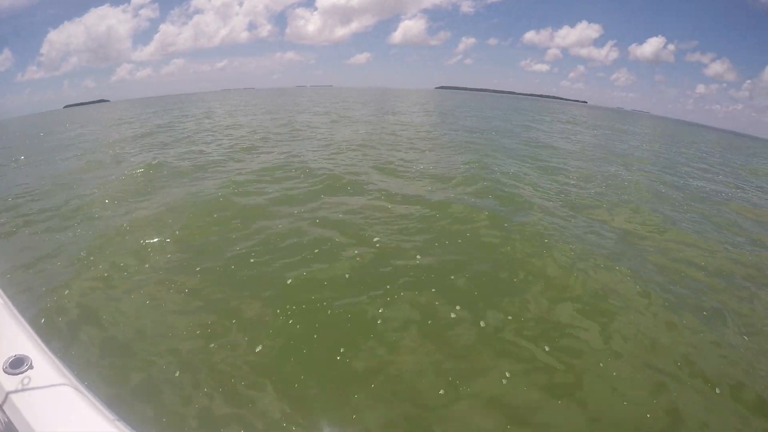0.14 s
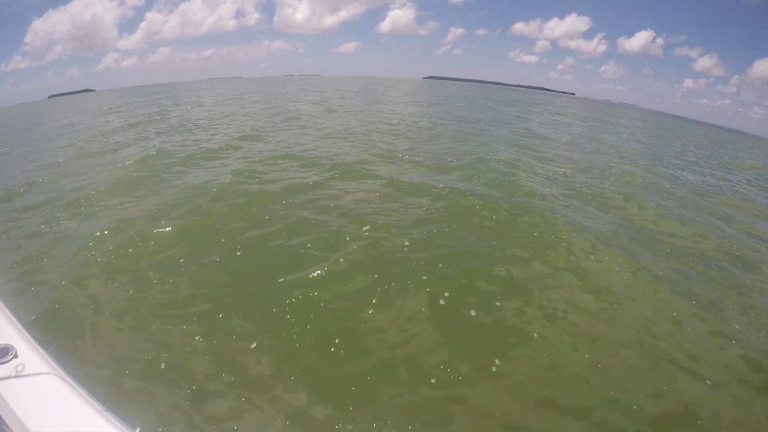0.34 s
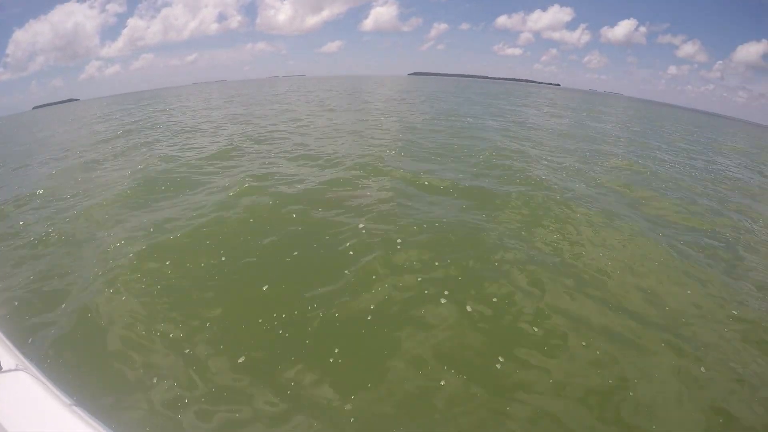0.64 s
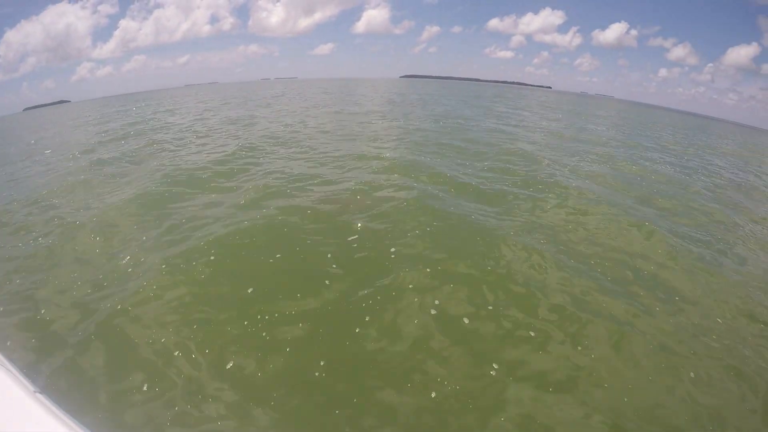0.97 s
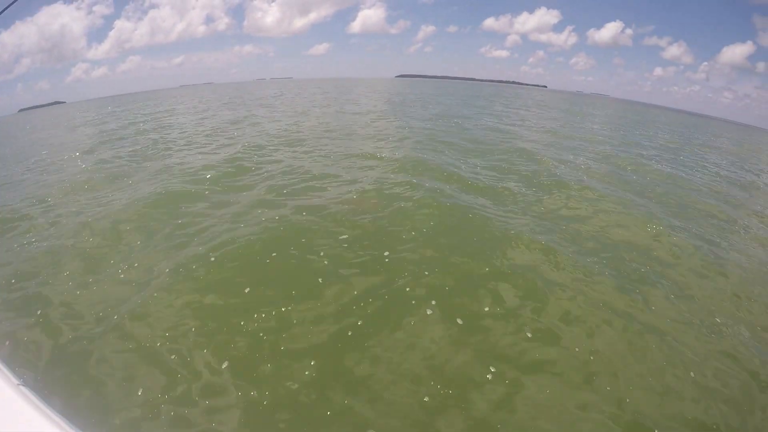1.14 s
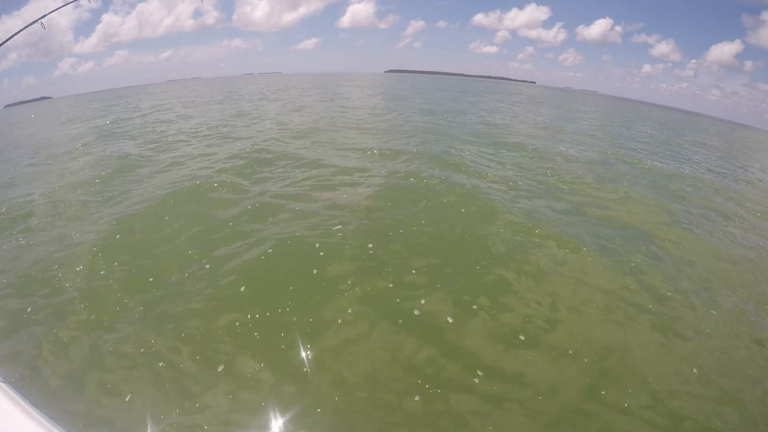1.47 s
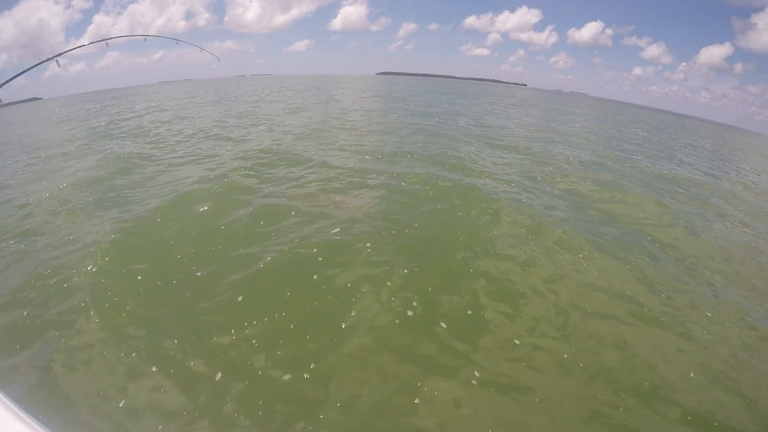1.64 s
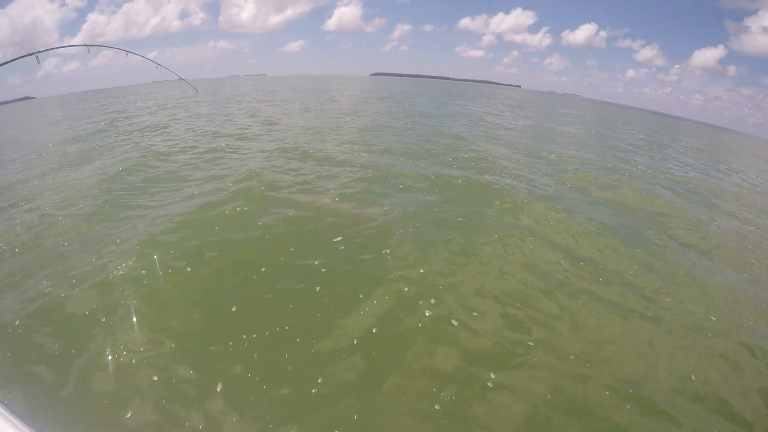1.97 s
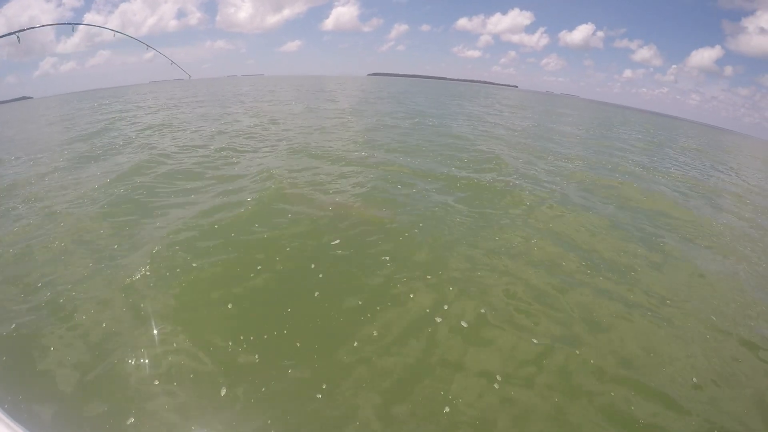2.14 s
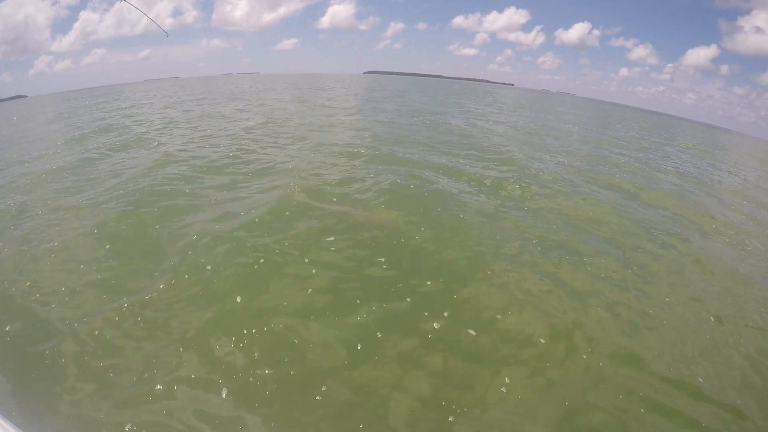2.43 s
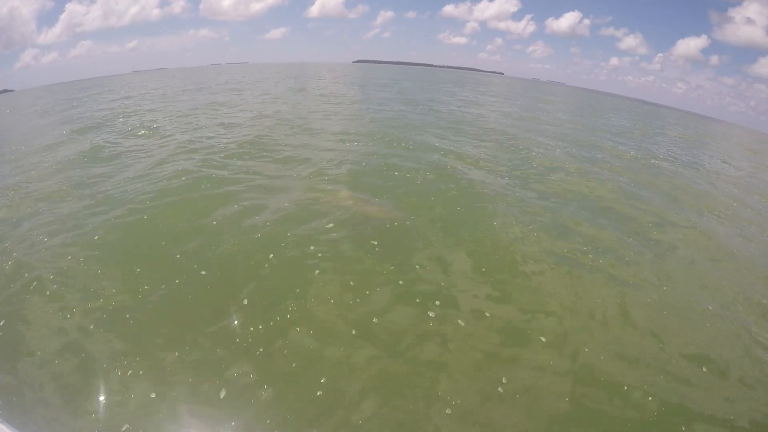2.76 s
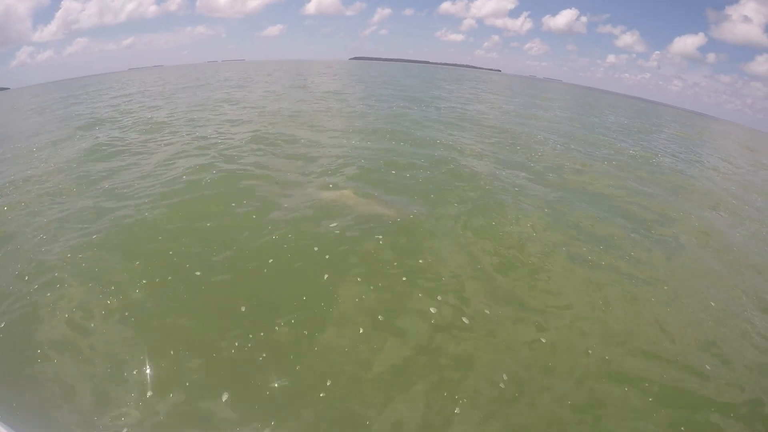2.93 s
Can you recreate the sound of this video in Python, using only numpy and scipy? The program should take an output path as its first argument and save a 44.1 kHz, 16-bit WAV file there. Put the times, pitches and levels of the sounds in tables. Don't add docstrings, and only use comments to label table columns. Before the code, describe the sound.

Close to the hull of a small boat, soft wavelets patter and bubble, with stronger slaps near 1 and 2.35 seconds. Wind jolts the microphone, faint reel clicks run from 2 seconds, and a pump whines faintly.

```python
import sys
import numpy as np
from scipy import signal
from scipy.io import wavfile
from scipy.ndimage import uniform_filter1d

SR = 44100
rng = np.random.default_rng(int(sys.argv[2]) if len(sys.argv) > 2 else 0)


def volts(x):
    e = np.asarray(x, float) / 20
    return 10 ** e


def persist_wave(psi):
    counts = np.round(np.clip(psi, -1, 1) * 32767).astype(np.int16)
    wavfile.write(sys.argv[1], SR, np.atleast_2d(counts).T)


N = 136710
T = np.arange(N) / SR

# time in seconds, level in dB.
LAP_ACTIVITY = [(0, -50), (.25, -50), (.43, -47.5), (.6, -55.5), (.84, -50.5), (.96, -41.5), (1.08, -47.5),
                (1.27, -44.5), (1.46, -51), (1.57, -45), (1.73, -40.5), (1.8, -45), (2.05, -49), (2.2, -49),
                (2.37, -41), (2.6, -46.5), (2.7, -56), (3.1, -55.5)]
# frequency in Hz, width in Hz, level in dB.
HULL_MODES = [(225, 350, -8), (390.6, 104, -2), (638, 288, 7.5), (812, 165, 6.5), (1100, 540, -23),
              (1597, 290, -4), (2210, 480, -11)]
# start in seconds, peak in dB, pitch in Hz, length in seconds.
GLUGS = [(2.432, -27, 190, 0.015), (.235, -44, 842, 0.023), (.279, -44, 385, 0.035),
         (.4, -38.5, 397, 0.016), (.675, -50.5, 900, 0.04), (.947, -30, 730, 0.015),
         (.968, -43, 720, 0.012), (1.055, -35.5, 831, 0.047), (1.215, -49.5, 1614, 0.032),
         (1.19, -47, 836, 0.12), (1.55, -51.5, 1615, 0.088), (1.662, -30.5, 235, 0.066),
         (1.69, -38, 877, 0.06), (1.715, -51, 1680, 0.043), (1.938, -37.5, 680, 0.034),
         (2.562, -27.5, 114, 0.045), (2.28, -44.5, 668, 0.08), (2.338, -26, 814, 0.016),
         (2.338, -32.5, 1340, 0.013), (2.338, -52.5, 2870, 0.016), (2.38, -27, 574, 0.018),
         (2.422, -27, 260, 0.011), (2.458, -27, 470, 0.0071), (2.512, -32, 383.4, 0.04),
         (2.79, -40.5, 305, 0.019), (2.92, -36, 366.7, 0.048), (2.962, -42.5, 725, 0.027)]
# start in seconds, peak in dB, pitch in Hz.
BUBBLES = [(.041, -43.5, 781), (.164, -46, 727), (.201, -42.5, 615), (.343, -42, 603), (.35, -46, 1105),
           (.362, -53, 1600), (.378, -41, 514), (.4, -51, 1590), (.43, -49.5, 1035), (.505, -46.5, 470),
           (.543, -45, 470), (.555, -56.5, 1150), (.589, -44.5, 548), (.866, -45, 817), (.876, -43, 490),
           (.892, -45, 295), (.918, -49.5, 1650), (.97, -43.5, 1050), (.985, -46, 403), (1.046, -38, 855),
           (1.047, -47, 1660), (1.048, -36.5, 574), (1.05, -56, 2210), (1.232, -42.5, 795),
           (1.262, -48, 796), (1.278, -49, 835), (1.33, -44, 610), (1.601, -44.5, 800), (1.65, -40, 910),
           (1.665, -42, 900), (1.66, -50, 1720), (1.685, -50, 1870), (1.715, -35.5, 533),
           (1.848, -47, 1430), (1.851, -43.5, 343), (1.985, -38.5, 320), (2.026, -39, 764),
           (2.075, -48, 1080), (2.199, -52, 775), (2.276, -41.5, 554), (2.315, -54, 714),
           (2.36, -32.5, 860), (2.39, -33.5, 400), (2.579, -43.5, 366), (2.772, -32, 166)]
# start in seconds, peak in dB, brightness in Hz.
SLAPS = [(.405, -44, 1810), (.885, -40.5, 950), (.962, -32.5, 1050), (1.046, -42, 2280), (1.668, -44, 960),
         (1.71, -42, 2620), (1.745, -38, 900), (2.025, -43, 2920), (2.337, -32, 1520), (2.39, -35, 1100),
         (2.779, -33, 1370)]
# start in seconds, peak in dB, pitch in Hz.
SPRAY = [(.142, -57, 2780), (.165, -52, 2360), (.374, -61, 2200), (.418, -64, 4870), (.5, -54.5, 2200),
         (1.362, -58.5, 4670), (1.43, -54.5, 3100), (1.66, -43, 2180), (1.71, -52, 2600),
         (1.726, -54, 2580), (1.74, -52, 2240), (1.725, -54.5, 5300), (1.81, -56.5, 11000),
         (1.875, -58.5, 4700), (2.021, -53.5, 2860), (2.457, -56, 2350), (2.463, -62, 3130)]
# time in seconds, eddy level in dB, flutter level in dB.
GUSTS = [(0, -51, -49), (.1, -44.5, -53), (.3, -50, -68), (.42, -40, -47), (.6, -45, -74), (.8, -53, -57),
         (1.05, -43, -44), (1.2, -41.5, -52.5), (1.62, -47, -62.5), (1.72, -50, -27.5), (1.8, -26.5, -37),
         (2.0, -30, -32), (2.13, -38, -76), (2.44, -28, -25.5), (2.6, -29.5, -49.5), (2.72, -42, -71),
         (2.92, -37.5, -44), (3.1, -43, -73)]
# frequency in Hz, density in dB per Hz.
EDDY_SPECTRUM = [(8, -27), (16, -2), (27, 4), (45, -4.5), (70, -15.5), (110, -28.5), (200, -36.5),
                 (400, -77)]
# frequency in Hz, density in dB per Hz.
FLUTTER_SPECTRUM = [(40, 0), (80, 9), (120, 6), (190, -4.5), (310, -14), (520, -26), (950, -52),
                    (1500, -95)]
# centre in seconds, peak in dB, half width in seconds.
PRESSURE_DIPS = [(0.514, -25, 0.0052), (1.718, -16, 0.0043), (1.728, -12.5, 0.0027), (1.75, -10.5, 0.0072),
                 (2.543, -15, 0.0049), (0.556, -23, 0.005), (1.025, -18, 0.0063), (1.084, -17, 0.0052),
                 (1.179, -11, 0.0088), (1.302, -23, 0.0057), (1.879, -7.5, 0.0039), (1.93, -6.5, 0.0068),
                 (2.153, -21, 0.0034), (2.26, -13, 0.0034), (2.426, -9, 0.0078), (2.914, -15.5, 0.0055)]
# centre in seconds, peak in dB, half width in seconds.
HARDEST_DIP = (1.988, -2.5, .0036)
# centre in seconds, peak in dB, half width in seconds.
PRESSURE_PUSHES = [(1.772, -16, 0.0042), (1.867, -10.5, 0.0048), (1.895, -13.5, 0.0078),
                   (2.02, -11.5, 0.0042), (2.373, -14.5, 0.0034), (2.519, -18, 0.0049), (2.62, -18.5, .005),
                   (1.164, -26, 0.01), (1.805, -11.5, 0.0045), (2.402, -11, 0.0083), (2.446, -11, 0.0051),
                   (2.891, -20, 0.0034)]
# start in seconds, snap level in dB, spring ring level in dB.
TICKS = [(.101, -51.5, -95), (1.785, -52, -63.5), (2.047, -57.5, -63), (2.077, -55.5, -64),
         (2.106, -59, -64), (2.13, -64, -72), (2.153, -54.5, -65), (2.176, -59.5, -65), (2.2, -57, -64),
         (2.228, -53, -70), (2.252, -51, -63), (2.274, -49.5, -64), (2.3, -51, -74), (2.329, -58, -68),
         (2.357, -55.5, -82), (2.39, -64, -74), (2.441, -54, -71), (2.49, -51.5, -66),
         (2.561, -49.5, -59.5), (2.63, -49.5, -56.5), (2.709, -49.5, -57.5), (2.838, -49.5, -63.5)]
# frequency in Hz, level in dB, 60 dB decay in seconds.
SNAP_MODES = [(4880, 3, 0.02), (5450, 9, 0.024), (5820, -0.5, 0.032), (8200, -4, 0.015),
              (10170, -0.5, 0.021), (12100, -5, 0.012)]
# time in seconds, pitch in Hz, level in dB.
WHINE = [
    (0, 1870, -62),
    (.3, 1884, -61.5),
    (1.1, 1878, -62),
    (1.3, 1864, -66),
    (1.5, 1866, -68),
    (1.65, 1885, -65),
    (2.2, 1894, -63),
    (2.55, 1872, -69),
    (3.1, 1880, -72),
]
# frequency in Hz, level at start in dB, level at end in dB.
FAINT_TONES = [(10406, -87, -86), (3150, -96, -77)]
# frequency in Hz, density in dB.
HISS_SPECTRUM = [(88, -32), (150, -1), (479, -6), (808, -6.5), (1360, -15.5), (1890, -15.5), (2580, -17),
                 (10800, -27.5), (15300, -33.5)]


def evened(x):
    return x / np.sqrt(np.mean(x ** 2) + 1e-20)


def curve(table, column=1):
    rows = np.array(table)
    return np.interp(T, rows[:, 0], rows[:, column])


def add(mix, start_s, sound):
    part = mix[round(start_s * SR):][:len(sound)]
    part += sound[:len(part)]


def drift(hz):
    lowpass = signal.butter(2, hz, fs=SR, output="sos")
    settled = signal.sosfilt(lowpass, rng.standard_normal(N + SR))[SR:]
    return evened(settled)


def coloured(spectrum, size, patchy_db=0., flicker_db=0.):
    hop, bin_hz = size // 4, np.fft.rfftfreq(size, 1 / SR)
    real, imag, patches = rng.standard_normal((N // hop + 5, len(bin_hz), 3)).T
    patches = uniform_filter1d(patches, size=6, axis=0)
    patches = evened(uniform_filter1d(patches, size=8, axis=1))
    hz, db = np.transpose(spectrum)
    level_db = np.interp(np.log(bin_hz + 1), np.log(hz + 1), db, left=-90)[:, None]
    level_db = level_db + patchy_db * patches
    level_db = level_db + flicker_db * rng.standard_normal(real.shape[1])
    bins = (real + 1j * imag) * volts(level_db)
    return evened(signal.istft(bins, nperseg=size, noverlap=size - hop)[1][:N])


def steadied(x):
    window_s = 0.055
    return x / np.sqrt(uniform_filter1d(x ** 2, round(window_s * SR)) + 0.00079)


def resonate(x, hz, width_hz):
    turn = np.exp(2j * np.pi * hz * T[:len(x)])
    r = np.exp(-np.pi * width_hz / SR)
    return 2 * (turn * signal.lfilter([1 - r], [1, -r], x / turn + 1e-18)).real


def lapping():
    drops_per_s, spread_db, drop_s, shared = 1200, 3.5, 0.002, 0.35
    size = volts(spread_db * np.minimum(rng.exponential(1, N), 4))
    size = size * (rng.random(N) < drops_per_s / SR)
    struck_mode = rng.integers(0, len(HULL_MODES), N)
    soft = np.exp(-T[:600] / drop_s) * T[:600]
    out = np.zeros(N)
    for k, (hz, width_hz, db) in enumerate(HULL_MODES):
        impacts = size * np.where(struck_mode == k, 1, shared)
        drive = signal.oaconvolve(impacts, soft)[:N] * rng.standard_normal(N)
        rung = resonate(resonate(drive, hz, width_hz), hz, 2 * width_hz)
        out += volts(db) * evened(rung)
    return evened(out) * volts(curve(LAP_ACTIVITY) - 5.5)


def glug(peak_db, hz, length_s):
    glide, wobble, roughness, rise_cycles, fade_db = 0.02, 0.04, 0.5, 1.72, -17
    t = T[:round(1.6 * length_s * SR)]
    smooth = signal.oaconvolve(rng.standard_normal((2, 9000)), np.hanning(300)[None], "valid")
    pitch_wander, level_wander = evened(smooth)[:, :len(t)]
    pitch_hz = hz * (1 + glide * (t / length_s - 0.5) + wobble * pitch_wander)
    shape = np.minimum(t * hz / rise_cycles, 1) * volts(fade_db * (t / length_s) ** 2)
    shape = shape * (1 + roughness * level_wander)
    return volts(peak_db) * shape * np.sin(2 * np.pi * np.cumsum(pitch_hz) / SR)


def bubble(peak_db, hz):
    return glug(peak_db, hz, length_s=0.01 + 1.57 / hz)


def slap(peak_db, bright_hz):
    t60_s, rise_s, direct = 0.034, 0.0014, 0.07
    t = T[:4000]
    burst = rng.standard_normal(len(t)) * volts(-60 * t / t60_s) * np.minimum(t / rise_s, 1)
    band = signal.butter(3, [bright_hz / 6, bright_hz], "band", fs=SR, output="sos")
    burst = signal.sosfilt(band, burst)
    rung = direct * burst
    for hz, width_hz, db in HULL_MODES:
        rung = rung + volts(db / 2) * resonate(burst, hz, width_hz)
    return volts(peak_db) * rung / abs(rung).max()


def hollow(x):
    tail_db, t60_s, rise_s = -4.5, 0.098, 0.0044
    t = T[:8000]
    tail = rng.standard_normal(len(t)) * volts(-60 * t / t60_s) * np.minimum(t / rise_s, 1)
    return x + volts(tail_db) * signal.oaconvolve(x, tail / np.linalg.norm(tail))[:N]


def droplet(peak_db, hz):
    return glug(peak_db, hz, length_s=0.0053)


def wind():
    eddy_db = curve(GUSTS) + 3 + 1 * drift(29.0)
    flutter_db = curve(GUSTS, column=2) + 2.5 * drift(4.4)
    eddies = steadied(coloured(EDDY_SPECTRUM, size=8192)) * volts(eddy_db)
    out = steadied(coloured(FLUTTER_SPECTRUM, size=4096)) * volts(flutter_db)
    for polarity, table in ((-0.74, PRESSURE_DIPS + [HARDEST_DIP]), (1, PRESSURE_PUSHES)):
        for centre_s, db, half_s in table:
            u = (T - centre_s) / half_s
            wide = np.exp(-(u / 3) ** 2)
            eddies = eddies * (1 - wide)
            out += polarity * volts(db) * (np.exp(-u ** 2) - wide / 3)
    return out + eddies


def tick(snap_db, ring_db):
    pitch_spread, level_spread_db = 0.02, 4
    spring_hz, spring_t60_s, free_s = 5800, 0.2, 0.06
    t = T[:4000]
    snap = np.zeros(len(t))
    for hz, db, t60_s in SNAP_MODES:
        level_chance, pitch_chance = rng.standard_normal(2)
        level = volts(db + level_spread_db * level_chance - 60 * t / t60_s)
        snap += level * np.sin(2 * np.pi * hz * (1 + pitch_spread * pitch_chance) * t)
    free = np.minimum(t / 0.0014, 1) * np.clip((free_s - t) / 0.0085, 0, 1)
    ring = free * volts(ring_db - 60 * t / spring_t60_s) * np.sin(2 * np.pi * spring_hz * t)
    return volts(snap_db - 10.0) * snap + ring


def pump():
    waver_hz, waver_db = 7, 2
    octave_db, octave_at_s, octave_for_s = -75, 1.3, 0.52
    phase = 2 * np.pi * np.cumsum(curve(WHINE) + waver_hz * drift(11.6)) / SR
    out = volts(curve(WHINE, column=2) + waver_db * drift(12)) * np.sin(phase)
    away = np.minimum(((T - octave_at_s) / octave_for_s) ** 2, 1)
    out += volts(octave_db - 10 * away) * np.sin(2 * phase)
    for hz, first_db, last_db in FAINT_TONES:
        level = volts(np.linspace(first_db, last_db, N) + 2 * waver_db * drift(28.0))
        out += level * np.sin(2 * np.pi * np.cumsum(hz + waver_hz * drift(6.2)) / SR)
    return np.sqrt(2) * out


def hiss():
    level_db = -59.5 - 0.5 * (T / T[-1] - 0.5)
    return volts(level_db) * coloured(HISS_SPECTRUM, size=512, patchy_db=1, flicker_db=1.3)


def scene():
    mix = wind() + lapping() + pump() + hiss()
    water = np.zeros(N)
    for table, source, into in ((GLUGS, glug, water), (BUBBLES, bubble, water), (SLAPS, slap, water),
                                (SPRAY, droplet, mix), (TICKS, tick, mix)):
        for start_s, *row in table:
            add(into, start_s, source(*row))
    return (mix + hollow(water))[None]


def roll_off(x):
    return signal.sosfilt(signal.butter(12, 15450, fs=SR, output="sos"), x)


def record(dry):
    edge_hz, starved_hz, ragged_hz, starve_db = 15440, 12600, 900, 2.2
    hz, t, z = signal.stft(dry, SR, nperseg=2048)
    power = (abs(z) ** 2).sum(1)
    starved = power > volts(2 * starve_db) * uniform_filter1d(power, size=21, axis=1)
    ragged_edge = starved_hz + ragged_hz * abs(rng.standard_normal(len(t)))
    thinned = (hz[:, None] > ragged_edge) & starved[:, None]
    z = z * (hz < edge_hz)[:, None] * np.where(thinned, 0.1, 1)
    mix = signal.istft(z, SR, nperseg=2048)[1][:, :N]
    return roll_off(mix)


dry = scene()
out = record(dry)
persist_wave(out)
```